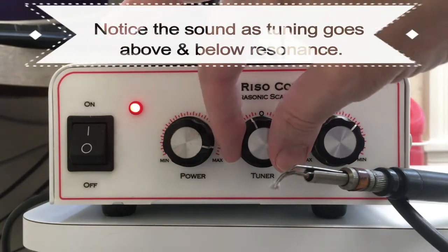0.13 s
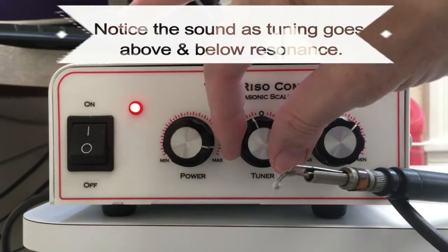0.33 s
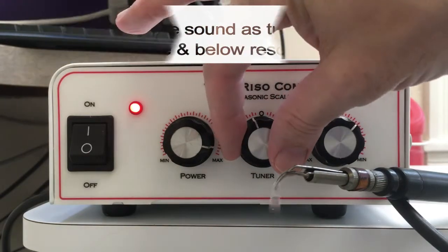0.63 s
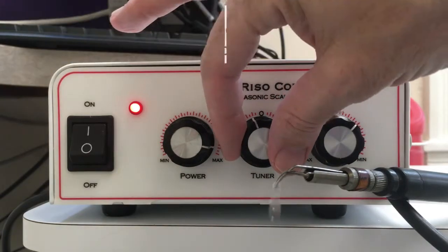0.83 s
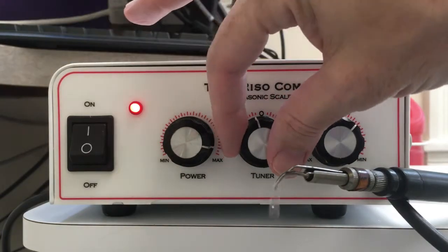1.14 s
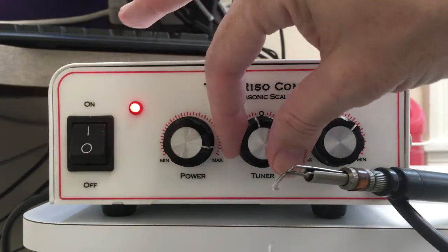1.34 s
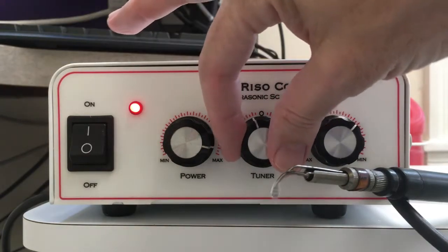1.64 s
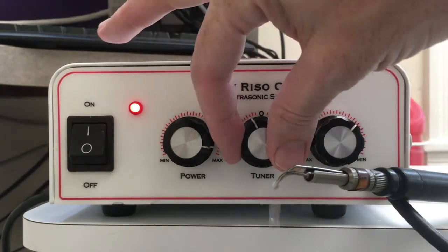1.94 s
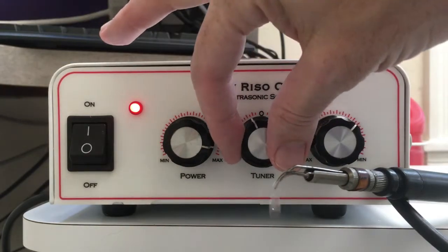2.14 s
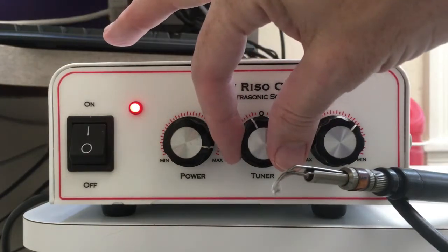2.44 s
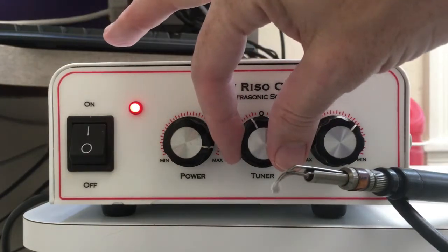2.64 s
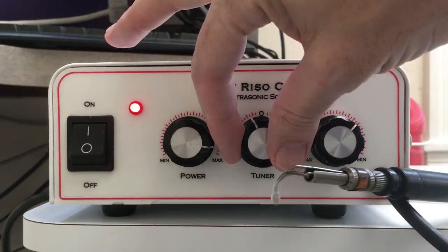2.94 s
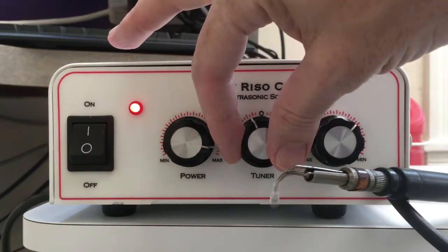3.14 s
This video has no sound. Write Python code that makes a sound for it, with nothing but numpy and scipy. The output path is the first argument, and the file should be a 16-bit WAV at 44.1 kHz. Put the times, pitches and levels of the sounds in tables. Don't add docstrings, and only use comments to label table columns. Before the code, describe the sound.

An ultrasonic dental scaler whines piercingly close by, sputtering with fine water spray; it thins into dry hiss around the middle, then the whine returns, over faint hum in a quiet room, phone microphone.

```python
import sys
import numpy as np
from scipy import signal
from scipy.fft import rfft, irfft, next_fast_len
from scipy.io import wavfile
from scipy.ndimage import uniform_filter1d, map_coordinates

SR = 44100
rng = np.random.default_rng(int(sys.argv[2]) if len(sys.argv) > 2 else 0)


def gain_from_decibels(decibels):
    exponent = np.asarray(decibels, float) / 20
    return 10 ** exponent


def unload_wav(signal):
    wavfile.write(
        sys.argv[1],
        SR,
        np.round(np.clip(np.atleast_2d(signal).T, -1, 1) * 32767).astype(np.int16),
    )


N = 145530
TIME = np.arange(N) / SR

# t/s, level/dB
SPUTTER_LEVEL = [(0.0, -23.5), (0.21, -19.5), (0.61, -19), (0.65, -28), (0.68, -13.5), (0.71, -19.5),
                 (1.0, -21), (1.14, -38), (1.16, -28), (1.3, -42.5), (1.35, -27.5), (1.42, -31.5),
                 (1.61, -22.5), (1.65, -25.5), (1.71, -15), (1.8, -23.5), (1.82, -17.5), (3.3, -19.5)]
# t/s, level/dB
FROTH_LEVEL = [(0.0, -57.5), (0.05, -65), (0.25, -50.5), (0.49, -58), (0.95, -56), (1.11, -70.5),
               (1.67, -60), (1.73, -54), (2.12, -53), (2.18, -55.5), (2.79, -50.5), (2.82, -53.5),
               (3.07, -52.5), (3.3, -56)]


def unit(x):
    return x / np.sqrt(np.mean(abs(x) ** 2) + 1e-20)


def curves(rows):
    s, *columns = np.transpose(rows)
    return [np.interp(TIME, s, column) for column in columns]


def wobble(rate):
    knots = rng.standard_normal(int(N * rate / SR) + 4)
    return map_coordinates(knots, [TIME * rate])


def bumps(rows):
    return sum(gain_from_decibels(db) * np.exp(-((TIME - s) / half_s) ** 2) for s, half_s, db in rows)


def crackle(grain_db, rate):
    return rng.standard_normal(N) * gain_from_decibels(grain_db * wobble(rate))


def filtered(x, response):
    m = next_fast_len(N + 8192)
    return irfft(rfft(x, m) * response(np.fft.rfftfreq(m, 1 / SR)), m)[:N]


def mode(f, hz, width_hz):
    return 1j * f * width_hz / (hz * hz - f * f + 1j * f * width_hz + 1e-9)


def coloured(x, spectrum):
    # f/Hz, width/Hz, level/dB
    body = [(8800, 150, 0.5), (9765, 1240, 4.5), (11270, 790, 2.5)]
    hz, db = np.transpose(spectrum)

    def response(f):
        curve = gain_from_decibels(np.interp(np.log(f + 1), np.log(hz), db, left=-120))
        ring = sum(gain_from_decibels(gain_db) * abs(mode(f, centre, width)) ** 2 for centre, width, gain_db in body)
        return curve * (1 + ring)

    return unit(filtered(x, response))


def room_tone():
    # f/Hz, level/dB per Hz
    room_spectrum = [(13, -42), (22, -13), (60, 3.5), (147, -10), (200, -7), (476, -17.5), (1340, -24.5),
                     (4860, -24.5), (6000, -29.5), (7800, -33), (13200, -120)]
    return gain_from_decibels(-57.5 + 0.41 * wobble(2.8)) * coloured(crackle(0.72, 20), room_spectrum)


def distant_motor():
    # f/Hz, width/Hz, level/dB
    hum_lines = [(54.72, 7.8, -60.5), (104.2, 13.7, -64), (119.5, 2.1, -72), (192.9, 5, -67.5),
                 (255.9, 14, -70), (328.9, 8.3, -76.5)]
    # t/s, load level/dB, level of the separate 256 Hz line/dB
    motor_drive = [(0.0, -67, -72), (0.14, -54.5, -70), (0.25, -49, -79), (0.95, -64, -69.5),
                   (1.14, -55.5, -75.5), (1.22, -61, -66), (1.75, -57.5, -71), (1.82, -68, -60.5),
                   (2.31, -47.5, -78), (2.46, -62.5, -68.5), (3.22, -62, -61.5), (3.3, -62, -85)]
    load_shows = 0.092
    load_db, separate_line_db = curves(motor_drive)
    load_db = load_db - load_db.mean()
    lines = []
    for hz, width_hz, db in hum_lines:
        line = unit(filtered(rng.standard_normal(N), lambda f: mode(f, hz, width_hz) ** 2))
        lines.append(gain_from_decibels(db) * line)
    lines[4] = lines[4] * gain_from_decibels(separate_line_db - separate_line_db.mean())
    held = signal.hilbert(lines[0])
    lowest = unit(np.real(held / abs(held) ** 1.1))
    return gain_from_decibels(hum_lines[0][2] + load_db) * lowest + gain_from_decibels(load_shows * load_db) * sum(lines[1:])


def passing_rumble():
    # f/Hz, width/Hz, level/dB
    low_ring = [(277, 140, 2), (537, 45, 2), (1390, 900, -22)]
    # f/Hz, width/Hz, level/dB
    high_ring = [(250, 40, -4), (745, 23, -6), (850, 30, -16), (985, 18, 1)]
    # centre t/s, half length/s, level/dB, share of the high resonances (0-1)
    puffs = [
        (0.122, 0.12, -65.5, .2),
        (1.23, 0.037, -64.5, 0.42),
        (1.316, 0.06, -62, 0.82),
        (1.407, 0.071, -57, .2),
        (1.494, 0.04, -62.5, 0.091),
        (1.57, 0.057, -62, 0.92),
    ]

    def rung(ring):
        return unit(filtered(crackle(1.5, 15),
                             lambda f: sum(gain_from_decibels(db) * abs(mode(f, hz, width)) for hz, width, db in ring)))

    low, high = rung(low_ring), rung(high_ring)
    return sum(bumps([puff]) * (low + share * (high - low)) for *puff, share in puffs)


def taps():
    # f/Hz, level/dB, t60/s
    counter = [(652, 2.5, 0.044), (890, 2, 0.02), (1090, -3.5, 0.051)]
    # t/s, dull knock level/dB, bright tick level/dB
    tap_events = [(.24, -54, -52.5), (.709, -62, -48.5), (.889, -54.5, -55), (1.085, -58, -52),
                  (1.226, -69, -51), (1.686, -55, -50), (1.85, -53, -63), (2.113, -46.5, -59),
                  (2.14, -57, -54), (2.316, -66, -49.5), (2.73, -53, -55), (3.166, -58, -55)]
    tick_t60_s, tick_trim_db = 0.068, 1.5
    out, t = np.zeros(N + SR), TIME[:SR // 10]
    knock = sum(gain_from_decibels(db - 60 * t / t60) * np.sin(2 * np.pi * hz * t) for hz, db, t60 in counter) / 2
    for s, knock_db, tick_db in tap_events:
        tick = uniform_filter1d(rng.standard_normal(len(t)), size=8)
        tick = tick * gain_from_decibels(tick_db + tick_trim_db - 60 * t / tick_t60_s)
        out[round(s * SR):][:len(t)] += gain_from_decibels(knock_db) * knock + tick
    return out[:N]


def mist():
    # f/Hz, level/dB
    mist_spectrum = [(7500, -23.5), (8800, -9), (10500, -10), (11300, -3.5), (12800, 2), (13600, 4),
                     (15000, 4.5), (15700, -3)]
    sputter_db, froth_db = curves(SPUTTER_LEVEL)[0], curves(FROTH_LEVEL)[0]
    follows_sputter, follows_froth = 0.074, 0.34
    level_db = -32.5 + follows_sputter * (sputter_db + 21)
    level_db = level_db + follows_froth * (np.maximum(froth_db, -64) + 53)
    return gain_from_decibels(level_db + wobble(18)) * coloured(crackle(2.34, 300), mist_spectrum)


def froth_fizz():
    # f/Hz, level/dB
    fizz_spectrum = [(4800, -29), (5300, -9), (6520, 1), (7000, -2.5), (7490, -2), (7900, -4), (8300, 2),
                     (9600, -58)]
    level_db = 2 + curves(FROTH_LEVEL)[0]
    return gain_from_decibels(level_db + 0.83 * wobble(15)) * coloured(crackle(2.62, 350), fizz_spectrum)


def handpiece_pings():
    # centre t/s, half length/s, level/dB
    ping_swells = [(.25, 0.035, -68), (.7, 0.033, -72), (1.4, .02, -69), (1.85, .03, -72),
                   (2.01, .025, -73), (2.12, .02, -72), (2.22, 0.045, -72), (2.31, 0.045, -70),
                   (2.38, .02, -70), (2.48, 0.022, -71), (2.6, 0.036, -73), (2.81, 0.048, -67),
                   (3.09, 0.054, -72)]
    ring = unit(filtered(crackle(2, 60), lambda f: mode(f, 3250, 190) ** 2))
    return ring * bumps(ping_swells)


def detuned_hiss():
    # t/s, level/dB
    detuned_level = [
        (1.0, -56),
        (1.2, -49),
        (1.3, -37),
        (1.4, -33),
        (1.45, -36),
        (1.5, -31.5),
        (1.64, -31.5),
        (1.72, -41),
        (1.85, -57),
    ]

    def bands(f):
        return mode(f, 14100, 1600) ** 2 + gain_from_decibels(-7) * mode(f, 9670, 760) ** 2

    return gain_from_decibels(curves(detuned_level)[0]) * unit(filtered(crackle(2, 300), bands))


def flung():
    # t/s, length/s, level/dB
    bursts = [(-.06, .195, -28), (.25, .035, -28), (.585, .12, -28), (1.0, .11, -31.5), (1.38, .04, -39),
              (1.5, .19, -31), (2.175, .11, -28.5), (2.41, .14, -31), (2.73, .05, -33), (2.815, .045, -27),
              (2.98, .04, -33), (3.14, .04, -32)]
    edge_s, rise_share = .012, .14

    def step(s, width_s):
        return 1 / (1 + np.exp(-np.clip(2 * s / width_s, -50, 50)))

    gain = np.zeros(N)
    for s, length, db in bursts:
        rise = step(TIME - s, edge_s + rise_share * length)
        fall = step(s + length - TIME, edge_s)
        gain += gain_from_decibels(db) * rise * fall
    return gain


def spray_bursts(spray):
    # f/Hz, level/dB
    spray_spectrum = [(7800, -40), (8800, -19), (10400, -17), (11200, -5), (12300, 2), (13400, 0),
                      (14300, -6), (15700, -13)]
    return spray * gain_from_decibels(1.2 + 1.5 * wobble(59.7)) * coloured(crackle(2.3, 440), spray_spectrum)


def steady_mode(spray):
    # t/s, f/Hz, level/dB, roughness (0-1)
    steady_path = [(0, 12250, -39, .9), (.13, 12190, -40, .9), (.16, 12245, -22, .15),
                   (.34, 12282, -20.5, .05), (.575, 12292, -20, .03), (.63, 12430, -27, .3),
                   (.7, 12300, -33, .8), (.74, 12285, -25, .35), (.99, 12280, -25, .35),
                   (1.1, 12270, -47, .9), (1.66, 12280, -38, .9), (1.7, 12290, -21, .3),
                   (1.78, 12285, -29, .7), (2.06, 12262, -22, .25), (2.2, 12265, -30, .7),
                   (2.33, 12268, -21, .2), (2.55, 12268, -20.5, .08), (3.3, 12258, -18.5, .03)]
    choke_db = 10
    hz, db, rough = curves(steady_path)
    turn = np.exp(2j * np.pi * np.cumsum(hz + 6 * wobble(25.34)) / SR)
    blur = unit(wobble(90) + 1j * wobble(81))
    tone = np.real(turn * (np.sqrt(1 - rough) + np.sqrt(rough) * blur)) * np.sqrt(2)
    return tone * gain_from_decibels(db + 0.34 * wobble(40.05) - choke_db * spray / spray.max())


def jolted(level_db):
    # t/s, peak level/dB
    jolts = [(0.0318, -19), (0.1216, -19), (0.1705, -15), (0.2064, -14), (0.2389, -8), (0.3182, -23),
             (0.4424, 2), (0.4813, -5), (0.5826, -8), (0.6699, -11), (0.7412, -9), (0.8121, -6),
             (0.8475, 2), (0.8759, -15), (0.9547, -5), (1.042, -11), (1.0824, -19), (1.1084, -30),
             (1.1583, -20), (1.29, -28), (1.3249, -29), (1.3518, -21), (1.4247, -28), (1.4835, -20),
             (1.515, -22), (1.5928, -14), (1.6696, -19), (1.708, -12), (1.7983, -19), (1.9699, -15),
             (2.0148, -18), (2.141, -17), (2.175, -15), (2.2338, -4), (2.2553, -2), (2.3176, -8),
             (2.3845, -7), (2.5666, -29), (2.7427, -10), (2.828, -10), (2.9851, -5), (3.1482, -6)]
    rise_s, fall_s, hush_s = 0.0016, 0.01, 0.0064
    jolt_db, hush_db = 4, 5.5
    usual_db, shows = 7.5, 0.42
    soft = 130
    swing = np.zeros(N)
    for s, db in jolts:
        at = round(s * SR)
        near = slice(max(at - SR // 20, 0), at + SR // 10)
        t = TIME[near] - s
        size = jolt_db + shows * (db - level_db[at] - usual_db)
        after = np.clip(t / rise_s, 0, 1) * np.exp(-np.maximum(t - rise_s, 0) / fall_s)
        hush = np.exp(-(t / hush_s + .5) ** 2) * (t < 0)
        swing[near] += size * after - hush_db * hush
    swing = uniform_filter1d(uniform_filter1d(swing, size=soft), size=soft)
    return swing - uniform_filter1d(swing, size=SR // 8) - .7


def sputtering_mode():
    core_hz, core_width_hz, kick_s = 12472, 48, .0025
    skirt_hz, skirt_width_hz, skirt_db = 12380, 330, -7.5
    kicks = crackle(1.5, 160)
    core = filtered(kicks, lambda f: mode(f, core_hz, core_width_hz) * mode(f, core_hz, 1 / kick_s))
    core = signal.hilbert(unit(core))
    core = unit(np.real(core / abs(core) ** .45))
    skirt = unit(filtered(kicks, lambda f: mode(f, skirt_hz, skirt_width_hz) ** 2))
    level_db = curves(SPUTTER_LEVEL)[0]
    fits_db = 0.85 * wobble(87)
    return gain_from_decibels(level_db + jolted(level_db) + fits_db) * (core + gain_from_decibels(skirt_db) * skirt)


def scene():
    spray = flung()
    background = room_tone() + distant_motor() + passing_rumble() + taps()
    water = mist() + froth_fizz() + handpiece_pings() + detuned_hiss() + spray_bursts(spray)
    tip = steady_mode(spray) + sputtering_mode()
    return (background + water + tip)[None]


def roll_off(x):
    return signal.sosfilt(signal.butter(12, 17030, fs=SR, output="sos"), x)


def record(dry):
    top_hz, slope_db_per_hz = 15730, .3
    limited = filtered(dry[0], lambda f: gain_from_decibels(-slope_db_per_hz * np.clip(f - top_hz, 0, 600)))
    ending = np.clip((TIME[-1] - TIME) / .003, 0, 1)
    return roll_off((limited * ending)[None])


dry = scene()
out = record(dry)
unload_wav(out)
```